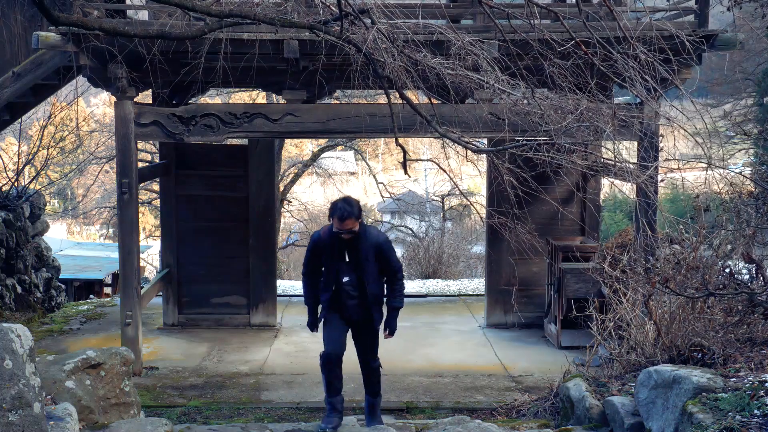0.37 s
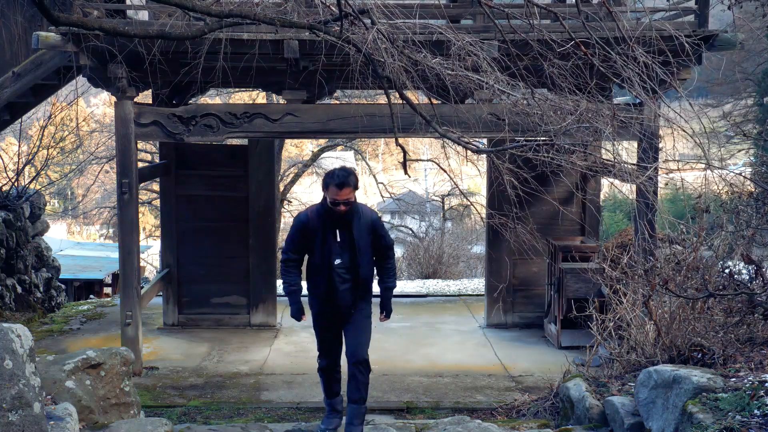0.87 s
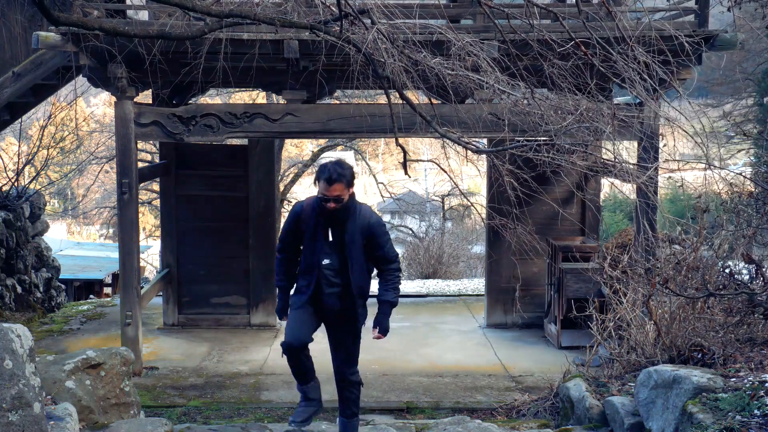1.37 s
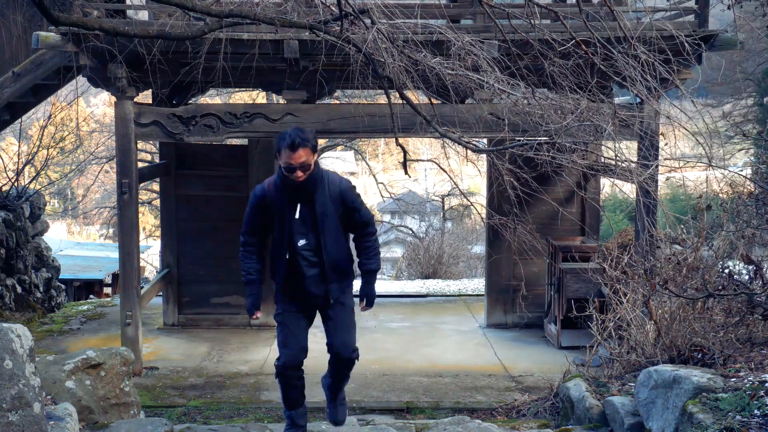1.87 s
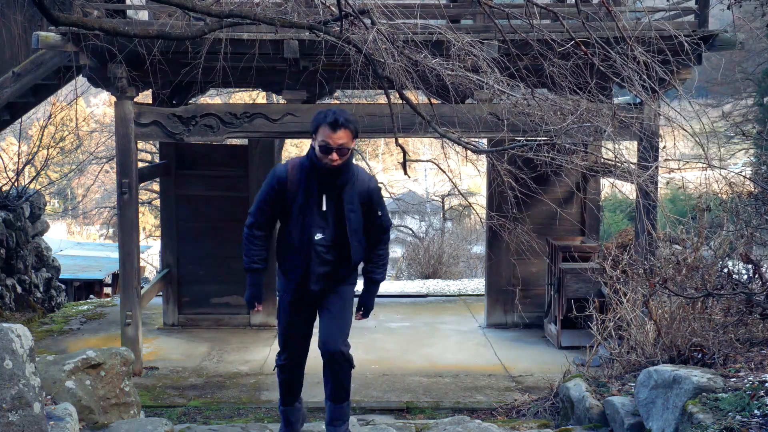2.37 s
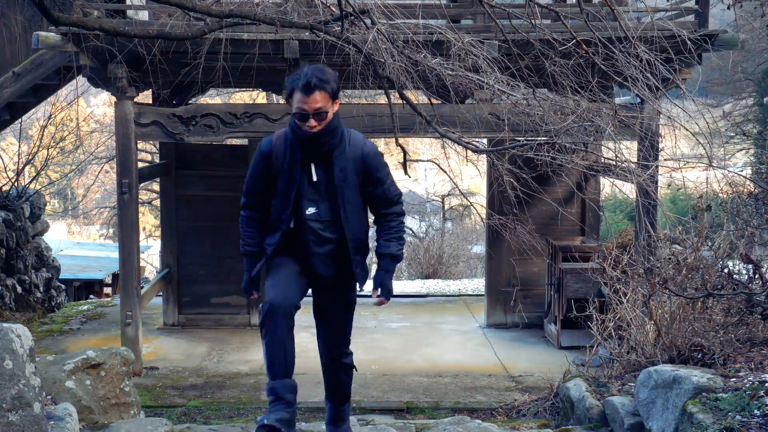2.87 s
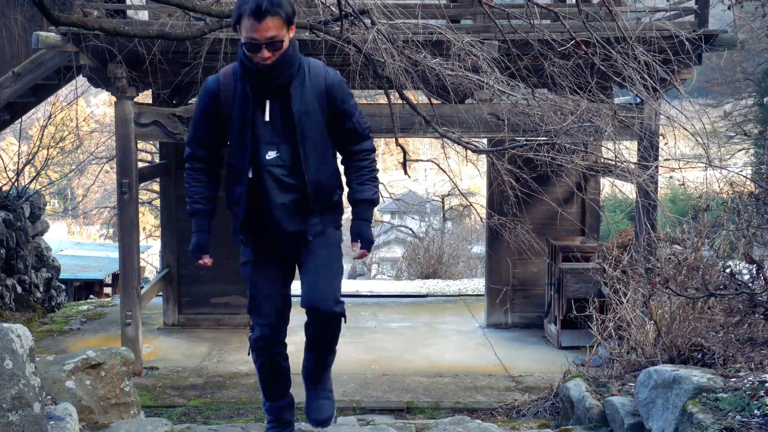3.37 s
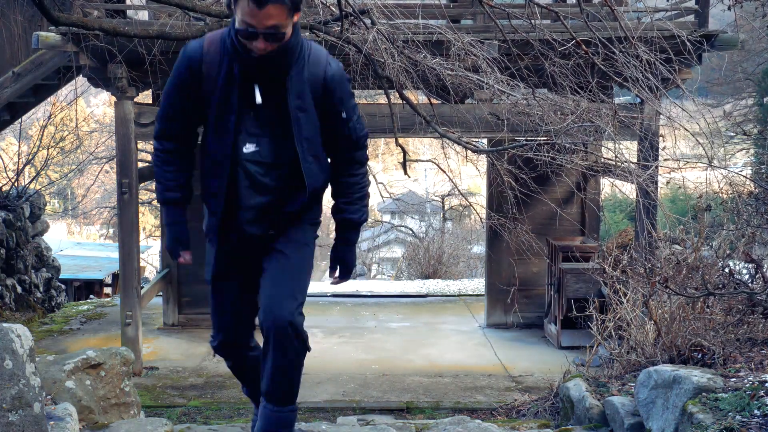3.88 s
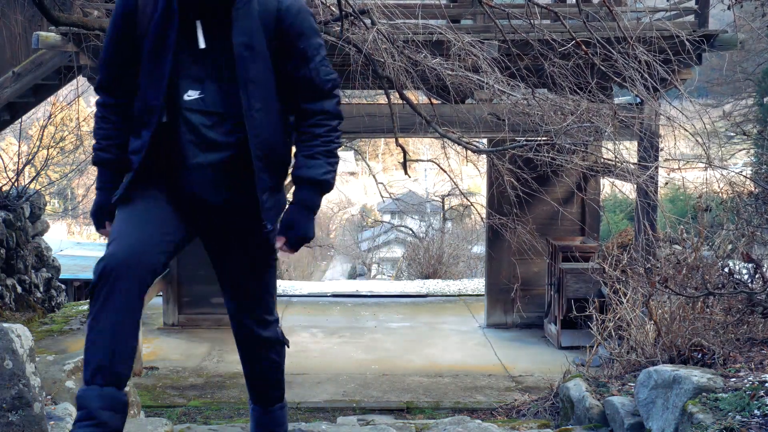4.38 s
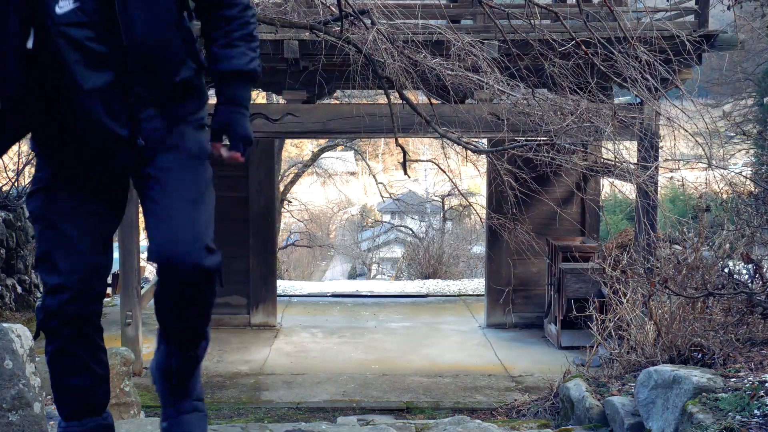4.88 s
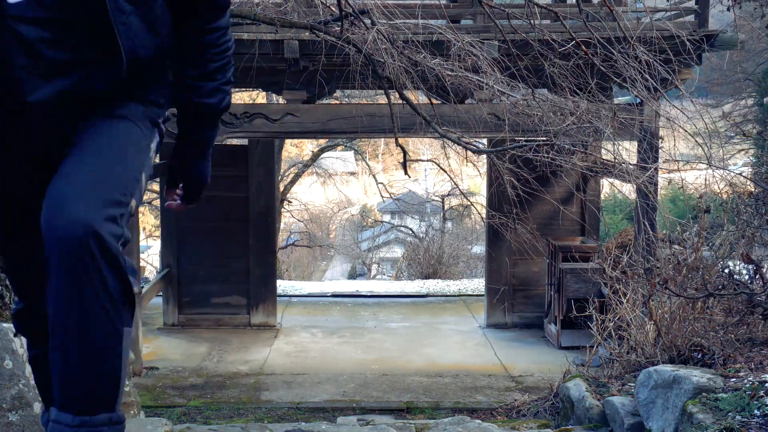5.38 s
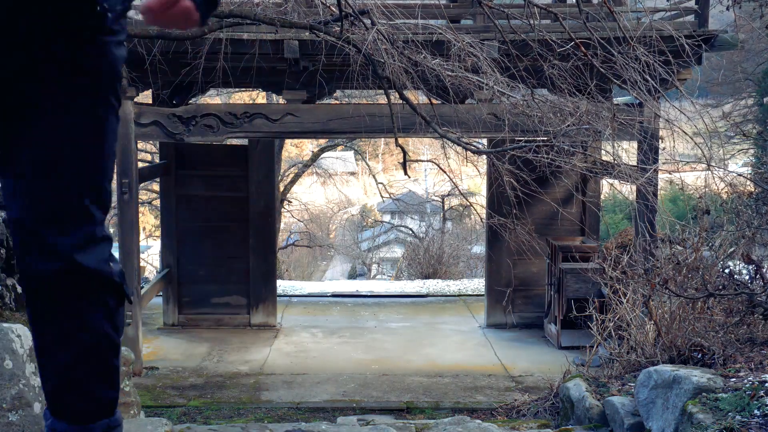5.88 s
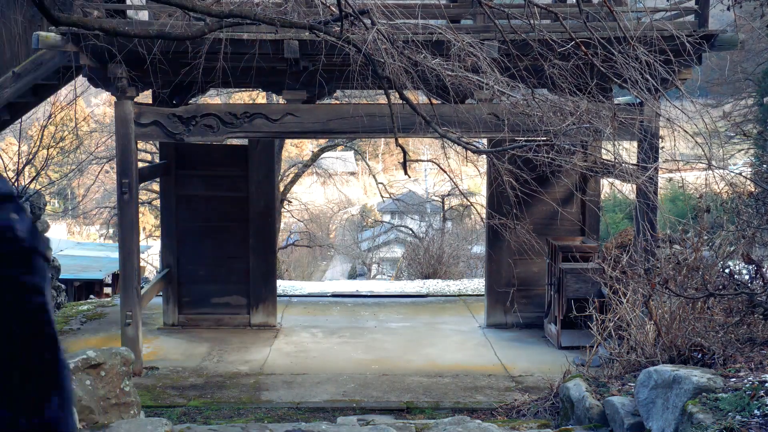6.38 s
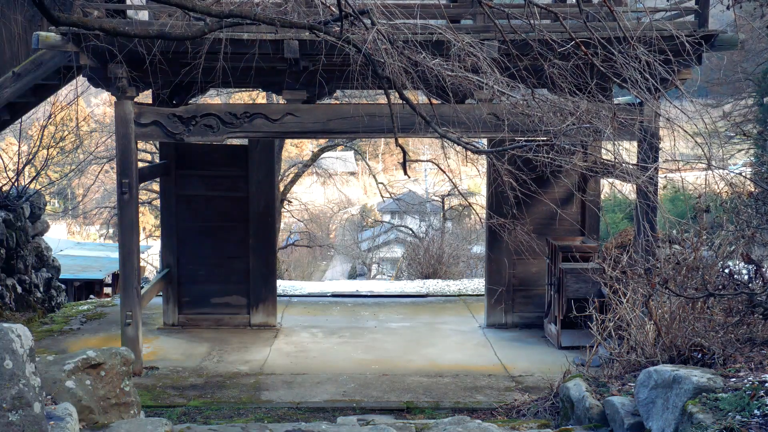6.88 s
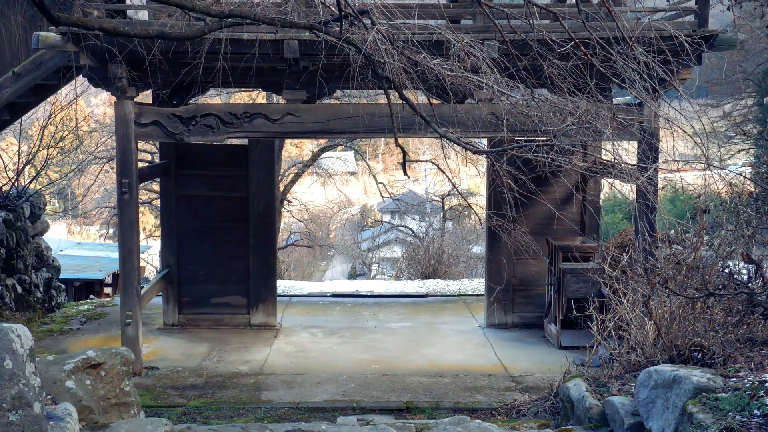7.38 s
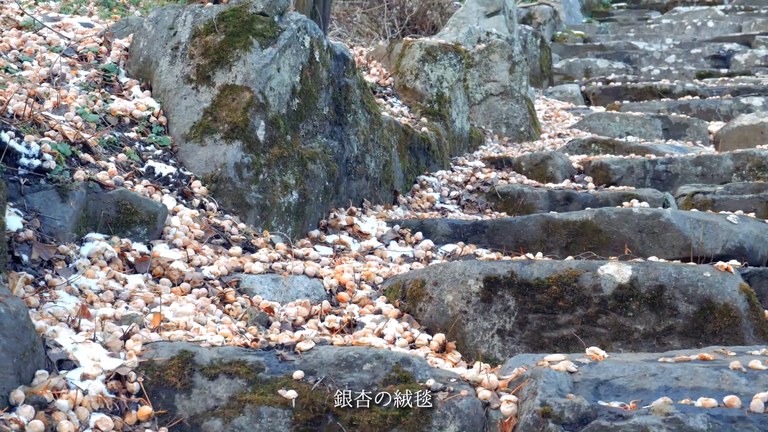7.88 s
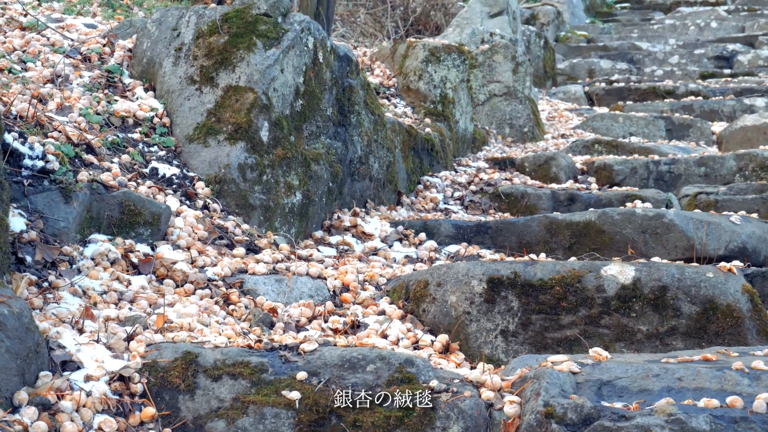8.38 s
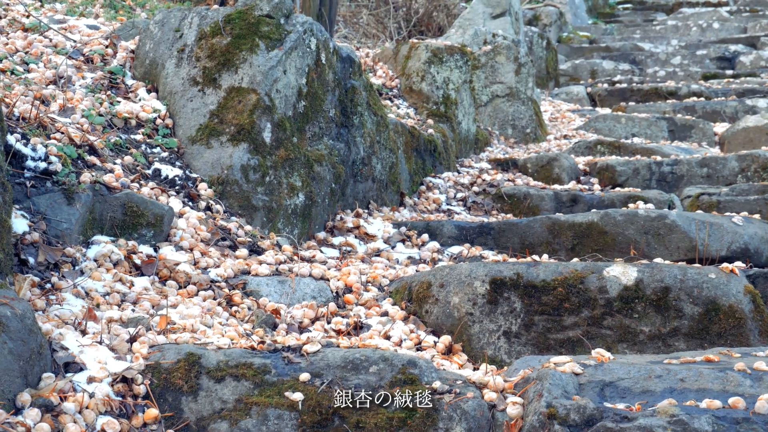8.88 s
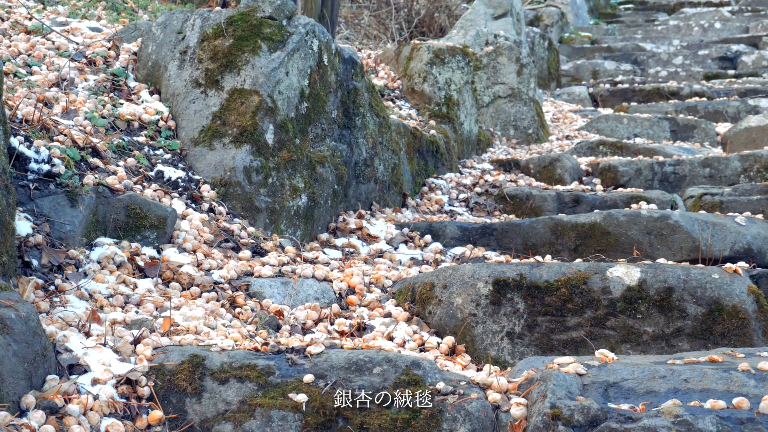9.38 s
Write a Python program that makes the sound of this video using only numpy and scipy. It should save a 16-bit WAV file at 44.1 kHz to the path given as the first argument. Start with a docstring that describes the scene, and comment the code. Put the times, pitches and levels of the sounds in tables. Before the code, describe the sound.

Outdoors, a steady thin hiss and hum holds throughout. A walker in soft boots comes nearer on rough stone, with sparse dull knocks and tiny nylon snaps. Faint birds whistle and chip in the distance. Short wind puffs strike the microphone as the body passes on the left; grit scrapes, rubber squeaks and one step cracks very loudly. A few softer scuffs follow, then the background turns duller with small bird chirps.

```python
"""Soft boots walk up rough stone paving and pass on the left: soles ring the slabs and scuff on grit.
A nylon jacket rustles and snaps; a zip pull, a rubber squeak and a thin drifting tone are brief.
Birds are gliding tones answered by trees; wind puffs are lumps of noise on the microphone.
Shaped noise gives the valley's hum and hiss; near the end the spot is quieter and duller."""
import sys
import numpy as np
from scipy import signal
from scipy.fft import rfft, irfft, next_fast_len
from scipy.io import wavfile
from scipy.ndimage import uniform_filter1d, map_coordinates

SR = 44100
rng = np.random.default_rng(int(sys.argv[2]) if len(sys.argv) > 2 else 0)


def undo_db(level):
    """Turn decibels back into plain size, where 20 dB means ten times bigger."""
    steps = np.asarray(level, float) / 20
    return 10 ** steps


def output_pcm(signal):
    """Save a mono or channel-first signal as 16-bit PCM at the path in sys.argv[1].

    Samples are clipped to [-1, 1] before scaling.
    """
    pcm = np.clip(np.atleast_2d(signal).T, -1, 1) * 32767
    wavfile.write(sys.argv[1], SR, np.round(pcm).astype(np.int16))


N = 419832
MOVE_S = 7.59  # from here on: the quieter spot


def unit(x):
    """x at rms 1."""
    return x / np.sqrt(np.mean(x ** 2) + 1e-20)


def along(points, hz):
    """(Hz, value) points read on a log frequency axis."""
    f, v = np.transpose(points)
    return np.interp(np.log(hz + 1), np.log(f + 1), v)


def curves(rows):
    """One value per sample for each column after the time."""
    s, *cols = np.transpose(rows)
    return [np.interp(np.arange(N) / SR, s, c) for c in cols]


def lasting(rows, fade_s):
    """1 while a table lasts, with soft ends."""
    t = np.arange(N) / SR
    to_edge_s = np.minimum(t - rows[0][0], rows[-1][0] - t)
    return np.clip(to_edge_s / fade_s + .5, 0, 1)


def away(s, rise_s, fall_s):
    """0 at second s, growing to 1 a rise before it and a fall after it."""
    t = np.arange(N) / SR - s
    return np.maximum(-t / rise_s, t / fall_s)


def wobble(rate_hz):
    """A smooth random curve, rate_hz knots a second."""
    knots = rng.standard_normal(int(N * rate_hz / SR) + 4)
    return map_coordinates(knots, [np.arange(N) * rate_hz / SR])


def filtered(x, response):
    """x times a response of frequency."""
    m = next_fast_len(x.shape[-1] + 4096)
    return irfft(rfft(x, m) * response(np.fft.rfftfreq(m, 1 / SR)), m)[..., :x.shape[-1]]


def band(hz, centre_hz, q):
    """Response of a causal resonance."""
    return 1j * hz * centre_hz / q / (centre_hz ** 2 - hz ** 2 + 1j * hz * centre_hz / q)


def panned(x, db):
    """Left and right, db apart."""
    return np.array([x * undo_db(db / 2), x * undo_db(-db / 2)])


def add(out, x, s):
    """Mixes x into out from second s."""
    part = out[:, round(s * SR):][:, :x.shape[1]]
    part += x[:, :part.shape[1]]


def sine(hz):
    """A sine that follows a frequency curve."""
    return np.sin(2 * np.pi * np.cumsum(hz) / SR)


def rush(spectrum, patchy_db, narrow=1):
    """Wide noise of rms 1 with patches of random gain."""
    # left-right likeness: f/Hz, correlation before narrow
    alike = [(120, .2), (300, 1), (640, 0.99), (1400, 0.77), (3100, 0.85), (5000, 0.76), (8400, 0.96),
             (11000, 0.73), (15000, 0.45)]
    z = signal.stft(rng.standard_normal((2, N)), nperseg=512)[2]
    field = uniform_filter1d(rng.standard_normal(z.shape[1:]), 6, 0)
    field = uniform_filter1d(field, 10, 1)
    pair = signal.istft(z * undo_db(patchy_db * unit(field)), nperseg=512)[1][:, :N]

    def mid_side(hz):
        turn = np.arccos(np.clip(narrow * along(alike, hz), -1, 1)) / 2
        return undo_db(along(spectrum, hz)) * [np.cos(turn), np.sin(turn)]

    mid, side = filtered(pair, mid_side)
    return unit(np.array([mid + side, mid - side]))


def crackle(spread_db):
    """Noise of rms 1 whose size jumps from grain to grain."""
    return unit(rng.standard_normal(N) * undo_db(spread_db * np.tanh(wobble(700))))


def drifting_tone(rows, rough):
    """An unsteady tone along (t, f, level) rows; rough is the share by which the pitch jitters."""
    hz, db = curves(rows)
    tone = sine(hz * (1 + rough * wobble(200)))
    return panned(lasting(rows, .004) * undo_db(db + 2.5 * wobble(150)) * tone, 1.1)


def air():
    """Smooth valley hum whose colour follows the spot; treble flutters as nylon rubs on nylon."""
    # background before the move: t/s, hum level/dB, treble hiss and rustle level/dB
    air_levels = [(0, -53.5, -52.5), (.4, -52, -52), (.9, -53, -51.5), (1.45, -54, -50), (1.9, -51.5, -51),
                  (2.2, -53.5, -52.5), (2.5, -54, -52), (2.85, -54, -53.5), (3.1, -53, -51.5),
                  (3.5, -54, -52), (3.8, -52, -53), (4.12, -54.5, -52), (4.6, -51.5, -52.5),
                  (4.95, -54, -55.5), (5.12, -51.5, -51), (5.45, -51, -50), (5.65, -55.5, -53.5),
                  (6.1, -55, -54.5), (6.5, -51.5, -55), (6.9, -50.5, -50.5), (7.2, -51, -53),
                  (7.58, -48.5, -52)]
    # the same two levels after it: hum level/dB, hiss level/dB
    quiet_spot_db = (-51.3, -59)
    # hum spectrum by the gate, before the move: f/Hz, relative density/dB
    gate_hum = [(71, -86), (120, -60), (475, -21), (515, -17.5), (669, -12), (775, -3.5), (1230, -1),
                (1670, -5.5), (1850, -5.5), (2100, -8.5), (2400, -5.5), (3070, -5), (3330, -7.5),
                (4540, -13), (6000, -13.5), (7800, -35), (13200, -120)]
    # hum spectrum after the move: f/Hz, relative density/dB
    quiet_hum = [(71, -96), (120, -66), (182, -48.5), (410, -25), (557, -21.5), (758, -8), (1070, -4),
                 (1330, -2), (2450, -6.5), (3390, -13), (4960, -19), (5330, -21), (6740, -19),
                 (9000, -30.5), (11700, -58.5), (19800, -120)]
    # hiss and rustle spectrum: f/Hz, relative density/dB
    hiss_spectrum = [(2350, -31), (4000, -1.5), (4140, -7.5), (4520, -2), (5570, -5), (6070, -3.5),
                     (9660, -1), (11200, -5), (14400, -10.5), (16000, -25)]
    at_gate = np.arange(N) < MOVE_S * SR
    hum_db, hiss_db = [np.where(at_gate, db, quiet_db)
                       for db, quiet_db in zip(curves(air_levels), quiet_spot_db)]
    by_gate = rush(gate_hum, patchy_db=1.6) * undo_db([[.8], [-.8]])
    after_move = rush(quiet_hum, patchy_db=1.0, narrow=0.91) * undo_db([[1.4], [-1.4]])
    hum = undo_db(hum_db + 0.54 * wobble(15)) * np.where(at_gate, by_gate, after_move)
    flutter_db = 0.27 * wobble(22) + 1.1 * wobble(90)
    hiss = rush(hiss_spectrum, patchy_db=1.7) * undo_db([[.4], [-.4]])
    return hum + undo_db(hiss_db + flutter_db) * hiss


def jacket():
    """Each crease is a short bright noise snap; fainter ones fall at random before the move."""
    # loudest creases: t/s, level/dB, f/Hz
    loud_ticks = [(.1216, -37, 8780), (.2204, -35, 10300), (.4683, -34, 6660), (.4766, -34, 6900),
                  (.865, -35, 5640), (1.3174, -33, 7950), (1.3316, -30, 8500), (1.339, -31, 6500),
                  (1.4421, -38, 7050), (1.6116, -32.5, 6980), (1.63, -33, 5660), (1.6676, -32, 9930),
                  (2.5451, -35, 8650), (2.7866, -36, 9410), (2.9417, -33, 11000), (3.43, -35, 8700),
                  (5.4494, -37, 8500), (5.469, -34, 9200), (5.5464, -36, 11000), (5.886, -36, 8990),
                  (7.0055, -33.5, 10900), (7.1307, -32, 6300), (7.1821, -28, 6300), (7.2094, -33, 9880)]
    t60_s, faint_db, faint_hz = .021, -38, 9000  # faint: loudest level, middle frequency
    out, t = np.zeros((2, N)), np.arange(SR // 4) / SR
    faint = [(u * MOVE_S, faint_db - 5 * v, faint_hz * (.8 + .4 * w))
             for u, v, w in rng.random(size=(18, 3))]
    for s, db, hz in loud_ticks + faint:
        burst = rng.standard_normal((2, len(t))) * undo_db(-60 * t / t60_s)
        mid, side = filtered(burst, lambda f: band(f, hz, 1.4) ** 2)
        add(out, undo_db(db) * (mid + 0.28 * side * [[1], [-1]]), s)
    return out


def steps():
    """A sole loads the slab, then grit points give way: they ring its modes and crack in the treble."""
    # sole on stone: t/s, peak level/dB, main ring f/Hz, treble re peak/dB, left-right/dB
    knocks = [(.764, -38.5, 2450, 14, 5), (1.05, -39, 1540, 5, 7), (2.3166, -25, 1600, -12, 1),
              (2.3195, -31, 1450, -16, 1), (2.335, -37, 1370, -11, 1.5), (2.353, -34, 1550, -16, 2),
              (2.362, -37, 1800, -14, 2), (3.027, -37, 1530, -10, 3), (3.052, -37, 2430, 3, 5),
              (3.081, -45, 1020, 8, 6), (3.7283, -20.5, 2200, -13, 1.5), (3.731, -32, 2300, -12, 1.5),
              (3.753, -35, 2450, -10, 4), (3.762, -30, 2300, -16, 2), (3.7693, -21, 1900, -14, 1),
              (3.7722, -28, 3300, -16, 1), (3.774, -30, 1300, -16, 1), (3.789, -36, 1200, -16, 1),
              (4.279, -42, 1400, 3, -.5), (4.562, -36, 4300, 10, 0), (4.663, -37, 3900, 9, -1),
              (5.345, -34, 1600, -10, -2), (6.089, -21, 3020, 5, 1), (6.188, -22, 1250, -2, 7),
              (6.196, -31, 1400, 0, 4), (6.21, -30, 1400, -2, 4), (6.2265, -21, 996, -2.5, 4),
              (6.3936, -2.5, 1300, -6, 4), (6.3984, -7, 1400, -13, 6), (6.406, -22, 2700, -8, 3),
              (6.426, -24.5, 1800, -4, -2), (6.451, -26, 2650, -8, 3), (6.457, -27, 1500, -10, 2),
              (6.461, -23, 1500, -7, 0), (6.466, -29, 3900, -10, 2), (7.0548, -23, 1190, -22, 6.5),
              (7.09, -25, 2400, -16, 7), (7.096, -22, 1900, -16, 9), (7.104, -23, 1600, -18, 2),
              (7.113, -28, 2000, -13, 5), (7.118, -32, 1000, -16, 5), (7.189, -26, 2100, -13, -2),
              (7.476, -36.5, 1120, 1, 0)]
    # slab modes: f/Hz, relative level/dB, share of the knock's t60
    slab_modes = [(1000, -5, 1.0), (1410, 0, 1.3), (1870, -3, 1.1), (2350, -4, .9), (2620, -1, .9),
                  (3080, -1, .8), (3870, 4, .9), (4350, 0, .7), (5790, -6, .6), (6870, -6, .6),
                  (8960, -3, .8), (9560, -6, .6)]
    full_t60_s, longer_s_per_db = .018, .0004  # full-scale blow; softer blows die sooner
    reach_db, narrower_per_db = .8, .8  # loss per octave squared; softer blows wake fewer modes
    click_db, click_t60_s = -3, .003  # broad stony click under the ring
    press_s = .0002  # time constant of the soft sole's loading
    out, t = np.zeros((2, N)), np.arange(SR // 10) / SR
    press = 1 - np.exp(-t / press_s)
    for s, db, hz, treble_db, pan_db in knocks:
        t60_s = max(full_t60_s + longer_s_per_db * db, .006)
        ring = np.zeros(len(t))
        for mode_hz, mode_db, share in slab_modes:
            # where the sole lands decides which modes speak
            loss_db = (reach_db - narrower_per_db * db) * np.log2(mode_hz / hz) ** 2
            level_db = mode_db - loss_db + rng.normal(0, 1.6)
            decay = undo_db(level_db - 60 * t / (t60_s * share))
            ring += decay * np.sin(2 * np.pi * (mode_hz * rng.normal(1, 0.02) * t + rng.random()))
        grit_points = rng.standard_normal(100) * undo_db(-60 * t[:100] / .005) * .06
        grit_points[0] = 1
        crack_noise = rng.standard_normal(len(t)) * press * undo_db(-60 * t / (0.64 * t60_s))
        crack = filtered(crack_noise, lambda f: band(f, 8000, .9) ** 2)
        knock = np.convolve(ring * press, grit_points)[:len(t)]
        click_noise = rng.standard_normal(len(t)) * undo_db(click_db - 60 * t / click_t60_s)
        click = filtered(click_noise, lambda f: band(f, 4300, .6) ** 2)
        knock = knock / np.abs(knock).max() + click
        add(out, panned(undo_db(db) * knock / np.abs(knock).max(), pan_db), s)
        add(out, panned(undo_db(db + treble_db) * crack, .4 * pan_db), s)
    return out


def whistles():
    """Whistled notes: unsteady pure tones that arch up and down."""
    # notes: top t/s, rise/s, fall/s, start f/Hz, top f/Hz, end f/Hz, level/dB
    notes = [(1.482, .06, .022, 3200, 3960, 3750, -43.5), (1.625, .035, .04, 3400, 3590, 3150, -49.5),
             (4.15, .056, .036, 2900, 4020, 3100, -37.5), (4.484, .042, .036, 3420, 3760, 3050, -42.5),
             (8.18, .056, .036, 2900, 3620, 2850, -48.5)]
    thin_top, pan_db = .45, -3  # share of tone lost at the top of the arch; bird to the right
    out, t = np.zeros((2, N)), np.arange(N) / SR
    for s, rise_s, fall_s, start_hz, top_hz, end_hz, db in notes:
        u = np.clip(away(s, rise_s, fall_s), 0, 1)
        hz = top_hz + (np.where(t < s, start_hz, end_hz) - top_hz) * u ** 2
        swell = (1 - u ** 1.8) * (1 - thin_top * np.exp(-(u / .22) ** 2))
        out += panned(swell * undo_db(db + 3 * wobble(90)) * sine(hz), pan_db)
    return out


def chips():
    """Small birds: short pure sweeps and level notes, slightly unsteady in level."""
    # notes: t/s, length/s, start f/Hz, end f/Hz, level/dB
    notes = [(1.64, .03, 4400, 4300, -56), (2.47, .035, 5000, 5900, -57), (2.84, .11, 6400, 3700, -58),
             (3.145, .05, 3660, 3620, -52), (3.185, .025, 5200, 5600, -55), (3.21, .12, 3660, 3620, -62),
             (3.435, .1, 6300, 3750, -55), (3.815, .09, 5900, 3950, -62), (4.3, .04, 6300, 6400, -61),
             (4.53, .03, 4330, 4420, -55), (4.565, .055, 2320, 2280, -55), (4.69, .035, 5200, 5500, -54),
             (4.73, .115, 4350, 3640, -56), (8.478, .005, 6200, 4600, -55), (8.507, .01, 5400, 5000, -57),
             (8.58, .007, 7000, 5200, -50)]
    # four quick chips: first t/s, spacing/s, length/s, start f/Hz, end f/Hz, level/dB
    first_s, spacing_s, *chip = (8.352, .0325, .005, 7600, 4600, -50)
    trill = [(first_s + k * spacing_s, *chip) for k in range(4)]
    out = np.zeros((2, N))
    for s, length_s, start_hz, end_hz, db in notes + trill:
        u = np.linspace(0, 1, round(length_s * SR))
        hz = end_hz + (start_hz - end_hz) * (1 - u) ** (1 + 13 * length_s)
        add(out, panned(undo_db(db) * np.sin(np.pi * u) ** .5 * sine(hz), 3), s)
    return undo_db(2.5 * wobble(80)) * out


def scuffs():
    """Grit rolls under a dragging sole: uneven grains in a resonance set by the drag, and a bright band."""
    # drags: peak t/s, rise/s, fall/s, peak level/dB, main f/Hz, treble re peak/dB
    drags = [(2.322, .004, .02, -50, 1450, -9), (2.373, .02, .035, -49.5, 1520, -14),
             (3.775, .005, .02, -51, 3000, -4), (3.79, .01, .05, -56, 1820, 2),
             (6.096, .005, .025, -52, 2600, 6), (6.145, .05, .05, -55, 2200, 4),
             (6.186, .01, .02, -47, 1540, 12), (6.212, .015, .015, -51, 1600, 5),
             (6.234, .004, .025, -51, 1660, 4), (6.3, .05, .06, -47.5, 1800, 2),
             (6.385, .04, .01, -50, 1530, -8), (6.405, .006, .05, -41, 1540, 0),
             (6.406, .004, .012, -44, 3500, -6), (6.43, .015, .02, -44, 2200, -4),
             (6.458, .02, .05, -42, 1870, -9), (6.56, .07, .06, -53, 1900, -12),
             (7.064, .012, .012, -53, 3300, -14), (7.086, .03, .03, -44, 3300, -13),
             (7.112, .02, .01, -50, 1900, -14), (7.165, .008, .03, -50, 2300, -6),
             (7.19, .02, .05, -47, 2000, -5), (7.28, .07, .04, -55, 1750, -2)]
    # resonances blended to reach the main frequency: f/Hz
    drag_hz = [1100, 1500, 2000, 2700, 3500]
    edge_db, pan_db = 12, 4  # level lost over a rise or a fall; drags left of centre
    grit = crackle(spread_db=6)
    tones = [unit(filtered(grit, lambda f: band(f, c, 4))) for c in drag_hz]
    wide = unit(filtered(grit, lambda f: band(f, 2300, 1.0)))
    bright = unit(filtered(crackle(spread_db=1.5), lambda f: band(f, 8200, 0.8) ** 2))
    out = np.zeros((2, N))
    for s, rise_s, fall_s, db, hz, treble_db in drags:
        u = away(s, rise_s, fall_s)
        place = np.interp(hz, drag_hz, np.arange(len(tones)))
        dull = sum(np.clip(1 - np.abs(place - k), 0, 1) ** .5 * tone for k, tone in enumerate(tones))
        drag = 1.14 * dull + 0.85 * wide + undo_db(treble_db) * bright
        out += panned((u < 1.5) * undo_db(db - edge_db * u) * drag, pan_db)
    return out


def wind():
    """Air stirred by the passing body hits the capsule in short rough lumps over softer buffeting."""
    # buffeting between lumps: t/s, level before the spectrum/dB
    breeze = [(3.9, -62), (4.54, -63), (4.73, -52), (5.0, -60), (5.56, -60), (5.8, -51), (6.05, -59),
              (6.4, -58), (6.49, -52), (6.7, -64), (7.03, -60), (7.4, -62)]
    # strongest lumps: t/s a sixth of the way in, level before the spectrum/dB
    lumps = [(4.239, -40), (4.269, -34), (4.558, -38), (4.614, -36), (4.662, -36), (4.693, -31),
             (4.713, -28.5), (4.894, -33), (4.938, -35), (5.016, -34), (5.213, -41), (5.335, -41),
             (5.579, -33), (5.647, -37), (5.789, -38), (5.939, -38), (5.989, -37), (6.023, -33),
             (6.19, -29), (6.22, -25), (6.45, -37), (6.578, -39), (6.615, -39), (7.046, -27), (7.108, -30)]
    # puff spectrum: f/Hz, gain/dB
    puff_spectrum = [(80, -48), (150, -13), (300, -7.5), (500, -6.5), (800, -8), (1500, -19), (3000, -60)]
    lump_s = .018
    breeze_db, = curves(breeze)
    buffeting = lasting(breeze, .1) * undo_db(breeze_db + 4.6 * wobble(30)) * rng.standard_normal(N)
    out = panned(buffeting, 1.1)
    for s, db in lumps:
        lump = np.hanning(round(lump_s * SR))
        add(out, panned(undo_db(db) * lump * rng.standard_normal(len(lump)), 1.9), s - lump_s / 6)
    return filtered(out, lambda f: undo_db(along(puff_spectrum, f)))


def faint_tone():
    """A thin, slightly rough tone drifts as the walker passes."""
    # tone: t/s, f/Hz, level/dB
    faint_rows = [(5.07, 1960, -61), (5.11, 1890, -60), (5.2, 1915, -61), (5.27, 1910, -60),
                  (5.3, 1830, -63)]
    return drifting_tone(faint_rows, rough=.008)


def squeak():
    """Rubber slips on stone: a short, rougher tone gliding upward."""
    # tone: t/s, f/Hz, level/dB
    slip_rows = [(6.268, 1444, -52.5), (6.3, 1890, -38), (6.31, 2050, -48.5)]
    return drifting_tone(slip_rows, rough=.03)


def zip_pull():
    """A small metal tab rings; later a short, narrow ring sounds: decaying sines."""
    # partials: t/s, f/Hz, level/dB, t60/s
    partials = [(6.574, 11719, -50, .25), (6.574, 14659, -54, .2), (7.298, 8800, -38, .025)]
    out, t = np.zeros((2, N)), np.arange(SR // 4) / SR
    for s, hz, db, t60_s in partials:
        add(out, panned(undo_db(db - 60 * t / t60_s) * np.sin(2 * np.pi * hz * t), 0), s)
    return out


def warble():
    """A bird's tone swings quickly in pitch while its centre falls; a rock close by echoes it."""
    # note: t/s, length/s, starting centre f/Hz, starting swing/Hz, turns per s, level/dB
    s, length_s, centre_hz, swing_hz, turns_hz, db = (8.592, .042, 8850, 900, 80, -39)
    # rock echo: delay/s, level/dB
    echo_s, echo_db = (.004, -3)
    out = np.zeros((2, N))
    u = np.linspace(0, 1, round(length_s * SR))
    swing = swing_hz * (1 - .4 * u) * np.cos(2 * np.pi * turns_hz * length_s * u)
    hz = centre_hz - 900 * u + swing
    note = panned(undo_db(db) * np.sin(np.pi * u ** .3) ** .5 * sine(hz), 0)
    add(out, note, s)
    add(out, undo_db(echo_db) * note, s + echo_s)
    return out


def answer(x, t60s, swell_s):
    """Diffuse echo of the surroundings: swells, then each frequency dies at its own speed."""
    hz, t, z = signal.stft(rng.standard_normal((2, SR // 2)), SR, nperseg=256)
    envelope = (1 - np.exp(-t / swell_s)) * undo_db(-60 * t / along(t60s, hz)[:, None])
    tail = signal.istft(z * envelope, SR, nperseg=256)[1]
    delayed = np.pad(x, ((0, 0), (400, 0)))  # samples
    return signal.fftconvolve(delayed, tail / np.linalg.norm(tail[0]), axes=1)[:, :N]


def scene():
    """Near sounds are nearly dry and thin in the bass, far birds wet."""
    # answer of gate and rocks: f/Hz, t60/s
    yard_t60 = [(500, 0.24), (3700, .6), (8000, 0.08)]
    # answer of the wood behind the birds: f/Hz, t60/s
    trees_t60 = [(2500, .25), (3700, .5), (6000, .2), (9000, .08)]
    # brief dips of all far sound: deepest t/s, fall/s, recovery/s, level/dB
    dips = [(4.285, .025, .035, -5), (4.645, .015, .06, -6), (4.76, .1, .11, -10), (4.912, .02, .025, -12),
            (4.955, .03, .045, -9), (5.73, .05, .05, -4)]
    thin = signal.butter(4, [750, 13500], "band", fs=SR, output="sos")
    near = jacket() + steps() + scuffs() + faint_tone() + squeak() + zip_pull()
    near = signal.sosfilt(thin, near)
    far = whistles() + chips() + warble()
    dip_db = sum(db * np.clip(1 - away(s, fall_s, recovery_s), 0, 1)
                 for s, fall_s, recovery_s, db in dips)
    near_wet = near + answer(undo_db(-27) * near, yard_t60, swell_s=.002)
    far_wet = far + answer(undo_db(-6.5) * far, trees_t60, swell_s=.008)
    return near_wet + undo_db(dip_db) * (far_wet + air()) + wind()


def roll_off(x):
    """The treble ends steeply here."""
    return signal.sosfilt(signal.butter(12, 15830, fs=SR, output="sos"), x)


def record(dry):
    """A low cut against wind, then two ports whose phases part in the top treble."""
    # port phase: f/Hz, left lead/rad
    port_lead = [(9800, 0), (11500, .6), (12600, .7), (14300, 2.1), (16000, 2.3)]
    low_cut = signal.butter(2, 400, "high", fs=SR, output="sos")
    ports = filtered(signal.sosfilt(low_cut, dry),
                     lambda hz: np.exp(.5j * along(port_lead, hz) * [[1], [-1]]))
    return roll_off(ports)


dry = scene()
out = record(dry)
output_pcm(out)
```